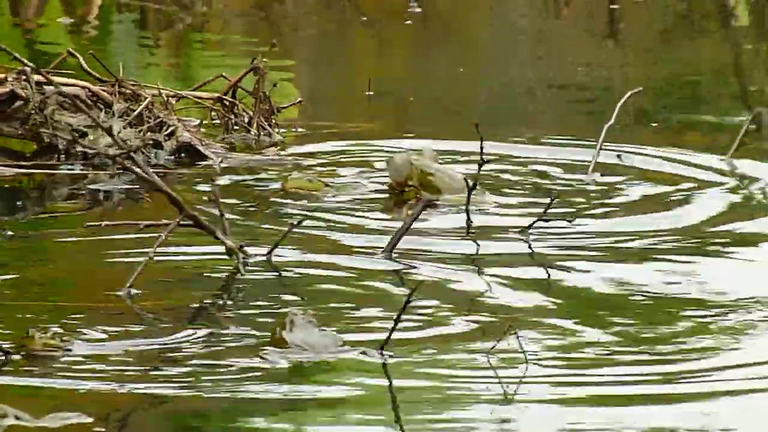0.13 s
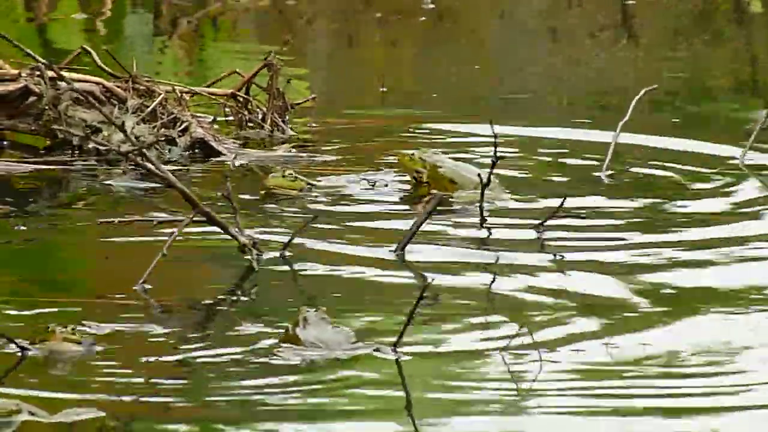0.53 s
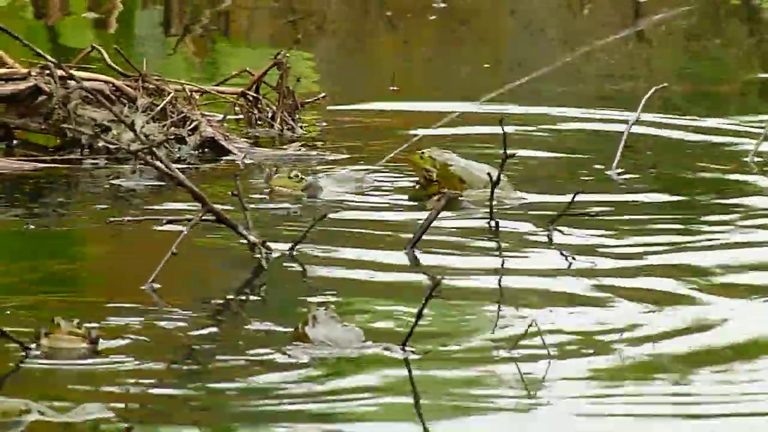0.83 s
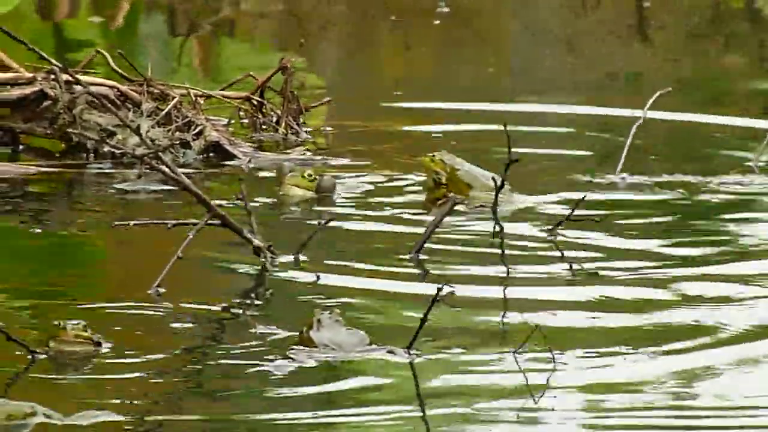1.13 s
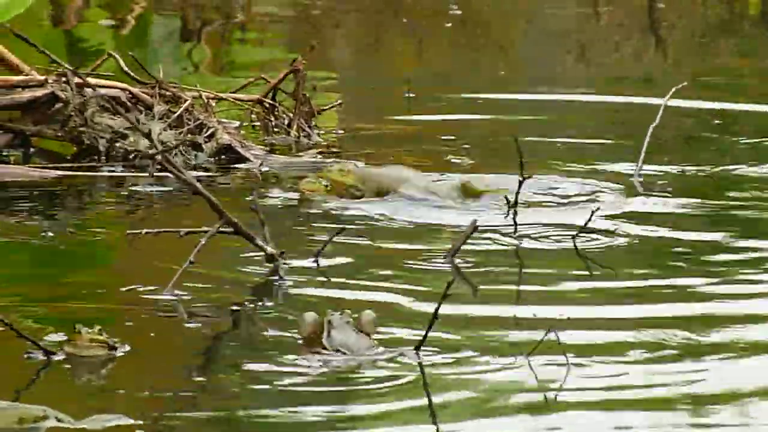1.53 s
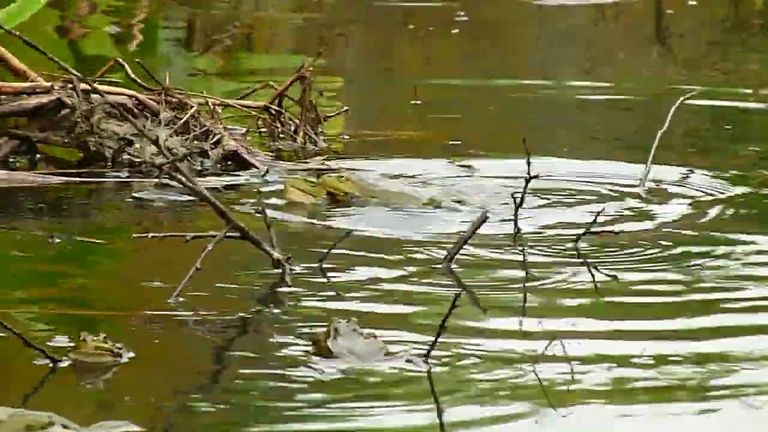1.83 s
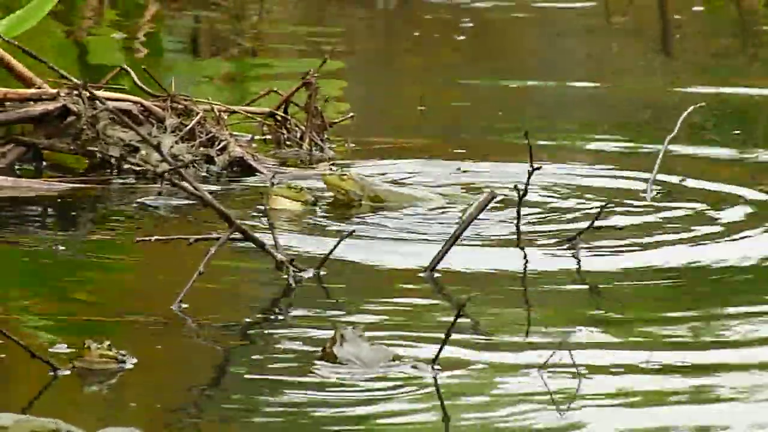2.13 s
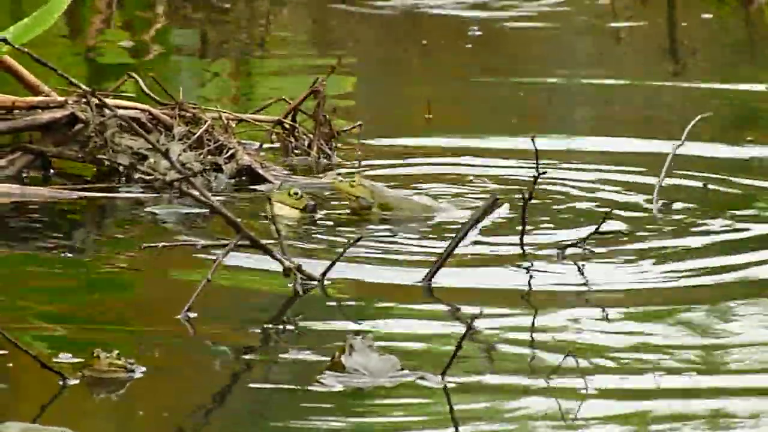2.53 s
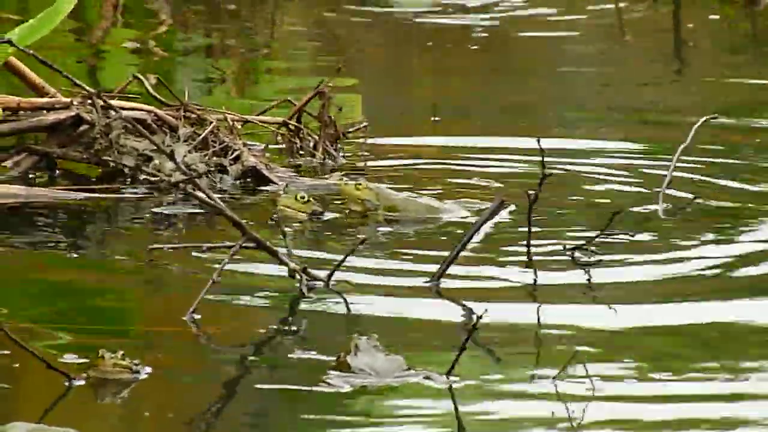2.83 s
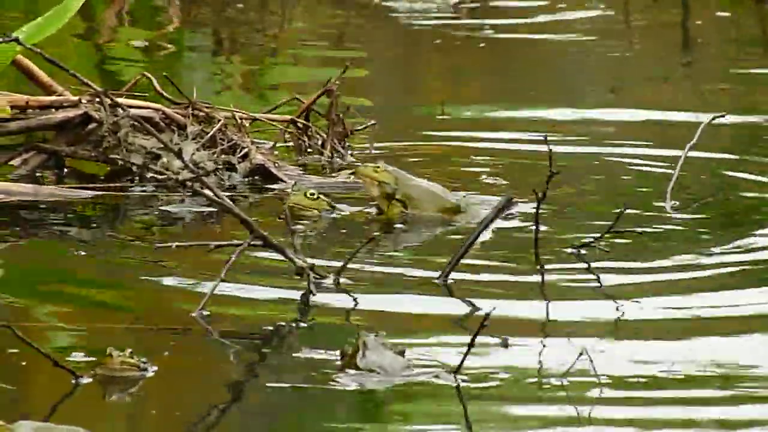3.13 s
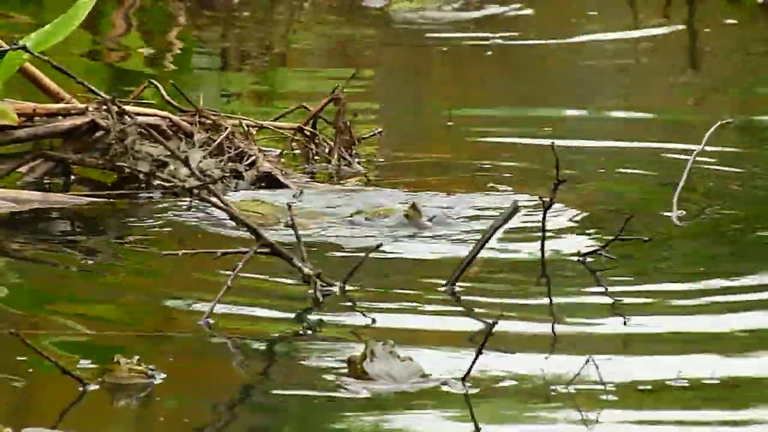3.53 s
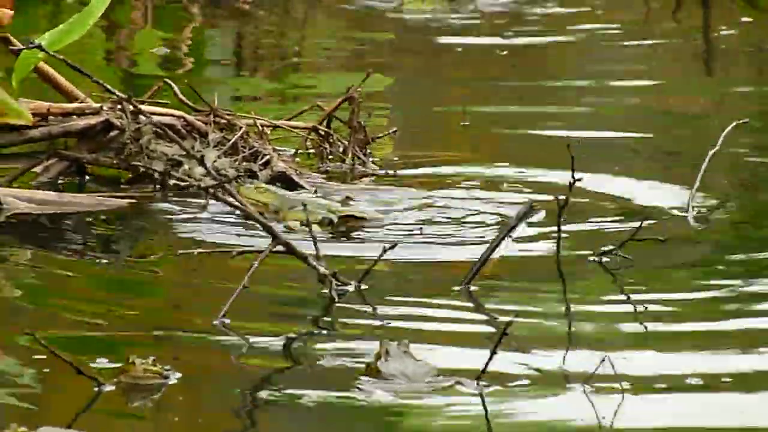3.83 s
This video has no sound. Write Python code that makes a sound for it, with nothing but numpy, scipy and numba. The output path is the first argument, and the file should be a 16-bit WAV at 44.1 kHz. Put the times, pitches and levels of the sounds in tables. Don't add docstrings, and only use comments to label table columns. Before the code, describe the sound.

Marsh frogs call on a pond. Deep and brighter frogs begin at once; from 0.1 to 1.05 s a near frog rattles seven loud, harsh croaks, each a tenth-second burst of rapid pulses. It repeats from 1.4 to 2.3 s; a farther frog answers twice around 2.3-2.6 s. A third run lasts 2.65-3.4 s, then weaker croaks and a low groan close over faint distant noise and rumble.

```python
import sys
import numpy as np
from scipy import signal
from scipy.fft import rfft, irfft
from scipy.io import wavfile
from scipy.ndimage import uniform_filter1d, minimum_filter1d
from numba import njit

SR = 44100
rng = np.random.default_rng(int(sys.argv[2]) if len(sys.argv) > 2 else 0)


def wrap_up_sound(samples):
    columns = np.atleast_2d(samples).T
    tamed = np.clip(columns, -1, 1)
    steps = np.round(tamed * 32767).astype(np.int16)
    wavfile.write(sys.argv[1], SR, steps)


def decibels_to_gain(level_db):
    exponent = np.asarray(level_db, float) / 20
    return 10 ** exponent


N = 176400

# [f/Hz, level/dB]
FAR_NOISE = [(95, -6), (220, -11.5), (600, 3.5), (1000, 6.5), (1900, 2.5), (2700, -16.5), (4300, -6),
             (7500, -21.5)]
# [t/s, level/dB]
FAR_NOISE_LEVEL = [(0, -26.5), (1.2, -32), (2.5, -36), (3.4, -32), (3.55, -36.5), (4, -35)]
# [t/s, level/dB]
BOOM_LEVEL = [(0, -31), (.15, -35.5), (.5, -44), (1.2, -41.5), (1.5, -43), (2.3, -41.5), (2.6, -45),
              (2.75, -40), (3.35, -38), (3.45, -45), (4, -42.5)]
# [t/s, level/dB]
WIND_LEVEL = [(0, -66), (1, -83), (1.2, -54.5), (2.2, -59.5), (3.4, -64), (3.55, -63.5), (4, -64.5)]
# [t/s, level/dB]
TRAFFIC_LEVEL = [(0, -75), (1, -70.5), (1.1, -43), (1.2, -70.5), (3.4, -49.5), (3.55, -44), (4, -43.5)]
# [t/s, f/Hz, level/dB]
ENGINE = [(0, 47, -74), (1.102, 55, -69.5), (1.252, 56, -57.5), (2.5, 59, -59), (3.399, 62, -60.5),
          (4, 64, -56)]
# [multiple of its pitch, level/dB]
ENGINE_UPPER = [(1.52, -6.5), (2.148, 0.5)]
# [t/s, length/s, level/dB, first f/Hz, last f/Hz]
GROAN_CALLS = [(0.001, .09, -25, 794, 934), (.11, 0.051, -24, 1010, 915), (0.332, 0.036, -33, 990, 1050),
               (0.613, 0.12, -22.5, 1270, 1170), (0.734, .08, -24, 895, 1104),
               (0.826, 0.26, -25.5, 727, 830), (1.122, .16, -26.5, 1315, 1470),
               (1.355, 0.074, -25, 1000, 1257), (1.468, 0.077, -27.5, 1220, 1150),
               (1.558, 0.13, -22.5, 1134, 1400), (1.865, .09, -33.5, 1200, 1100),
               (2.04, 0.1, -27, 800, 1054), (2.202, 0.092, -29, 960, 798), (2.195, .1, -23.5, 1470, 1350),
               (2.666, 0.026, -20.5, 1245, 1166), (2.744, 0.029, -24.5, 790, 785),
               (2.777, 0.14, -29.5, 1027, 1090), (2.859, 0.047, -31.5, 900, 970),
               (3.161, 0.12, -33.5, 648, 790), (3.278, 0.044, -18, 1090, 1285),
               (3.34, 0.067, -23.5, 1220, 956), (3.501, 0.079, -28.5, 1190, 1050),
               (3.631, 0.077, -29.5, 1050, 1264), (3.899, 0.52, -26, 1145, 1350)]
# [t/s, level/dB, sac f/Hz, first pulse rate/Hz]
FAR_NOTES = [
    (2.318, -20.5, 1826, 347.3),
    (2.462, -19, 1800, 327.8),
]
# [t/s, level/dB, sac f/Hz, first pulse rate/Hz]
DEEP_NOTES = [(.002, -11.5, 1369, 279), (.21, -12, 1740, 306), (.375, -16, 1563, 290),
              (.48, -19.5, 1613, 261.6), (.625, -16, 1660, 284), (.795, -15.5, 1756, 286.2),
              (1.0, -20, 1386, 275.5), (1.478, -18.5, 1625, 261), (1.71, -33.5, 2076, 273.7),
              (1.99, -22.5, 1780, 265.3), (2.158, -20.5, 1720, 282.4), (2.225, -23.5, 1610, 275),
              (2.722, -17, 1398, 254.4), (2.852, -19.5, 1460, 234.2), (2.95, -22, 1574, 262.7),
              (3.097, -17, 1570, 258.5), (3.2, -24, 1680, 281.3), (3.345, -15.5, 1606, 276.8),
              (3.39, -19.5, 1510, 255.7), (3.503, -20, 1525, 253.7)]
# [t/s, level/dB, sac f/Hz, first pulse rate/Hz]
LEFT_NOTES = [(.055, -15.5, 1740, 288.3), (.35, -22.5, 1710, 291), (.6, -25, 1930, 290),
              (.74, -22.5, 1900, 290.2), (.893, -19.5, 1950, 281.5), (1.05, -20.5, 1910, 295.5),
              (1.19, -19, 1884, 288.3), (1.322, -21.5, 1696, 280), (2.93, -27.5, 1680, 289),
              (3.09, -26, 1810, 289.4), (3.253, -17, 1973, 287.2), (3.427, -18.5, 1920, 292.4),
              (3.584, -19.5, 1780, 297.3), (3.737, -20.5, 1680, 289)]
# [t/s, level/dB, sac f/Hz, first pulse rate/Hz]
NEAR_NOTES = [(.116, -9.5, 1546, 312.7), (.256, -7.5, 1708, 339), (.398, -7.5, 1926, 375.7),
              (.553, -8, 1990, 380.6), (.698, -8, 1996, 389.4), (.836, -10.5, 1980, 344.4),
              (.952, -10, 1708, 282.6), (1.404, -10.5, 1667, 315), (1.534, -7, 1838, 348.2),
              (1.654, -8, 1953, 374.9), (1.790, -9, 2043, 385.2), (1.931, -7, 2058, 385.4),
              (2.062, -9, 2117, 330), (2.183, -10.5, 1973, 317.7), (2.647, -8, 1813, 325.1),
              (2.769, -8.5, 1940, 345.4), (2.896, -8, 2120, 360), (3.018, -7.5, 2092, 392.3),
              (3.150, -7.5, 2210, 346), (3.271, -12, 1880, 336.5)]
# [f/Hz, width/Hz, level/dB]
FAR_THROAT = [(2210, 390, -14.5), (3090, 100, -13), (3270, 39, -13.5)]
DEEP_THROAT = [(2396, 97, -13.5), (3267, 256, -12.5), (5800, 74, -48.5)]
LEFT_THROAT = [(2340, 94, -6.5), (3900, 266, -11), (3080, 530, -14), (6100, 970, -50.5)]
NEAR_THROAT = [(2600, 294, -13), (3399, 150, -10.5), (5760, 170, -24.5), (6995, 440, -32.5),
               (3046, 150, -17), (8560, 220, -28), (3640, 230, -27)]
FAR_BRIGHTNESS = [0, -3.5]
DEEP_BRIGHTNESS = [-8, -2, 5, 2.5, -1, -2.5, -2, -6.5, 7, -2, -1, -8.5, 0.5, -2, 0, -2, 7, -6.5, -4, -4]
LEFT_BRIGHTNESS = [-4.5, -1, 3.5, 6.5, 1.5, 1.5, -2, -5, 0, 1, 0.5, 1, 0, -6]
NEAR_BRIGHTNESS = [-3.3, -1.2, -1.2, -1.8, -1.7, 0.6, -2.8, -1.1, -2.5, 1, 1, 0.5, -0.26, -2, -0.2, 0.99,
                   0.95, 1, 0.43, 0]
NEAR_TAUTNESS = [1.3, 1.1, 0.79, 1.2, 0.63, 0.6, 1.2, 3.3, 1, 0.6, 1.4, 0.73, 1.2, 1.2, 1.4, 0.79, 0.44,
                 0.72, 0.3, 1.5]
# [f/Hz, width/Hz, level/dB]
BODY_RESONANCES = [(310, 45.5, -31.5), (1050, 490, -15)]
# [t/s, peak over full scale level/dB]
HARD_PULSES = [(.405, .2), (.563, .9), (1.547, .6), (1.815, 1.1), (2.777, .8), (2.92, 1.1), (3.032, .7),
               (3.166, 1.3)]
# [left minus right level/dB, lead of the left side/samples]
POSITIONS = [
    (1.1, 1.9),
    (4.5, 1.5),
    (3.5, 1.5),
    (-.7, 2.),
    (.5, 1.1),
]

GAIN_DB = -4.5
ROUGH_LAST = .12
THROAT_SKIRT = 2.6
SIDES = np.array([[1], [-1]])


def noise():
    return rng.standard_normal(N)


def unit(x):
    return x / np.sqrt(np.mean(x ** 2) + 1e-18)


def curve(table):
    return decibels_to_gain(np.interp(np.arange(N) / SR, *np.array(table).T))


def walk(rate_hz):
    k = int(SR / rate_hz)
    steps = np.repeat(rng.standard_normal(N // k + 1), k)
    return 0.75 * uniform_filter1d(uniform_filter1d(steps, k), k)[:N]


def add(track, x, t):
    i = int(t * SR)
    track[i:i + len(x)] += x[:N - i]


def ring(x, hz, width):
    return signal.lfilter(*signal.iirpeak(min(hz, .45 * SR), hz / width, fs=SR), x)


@njit
def glide(x, hz, width):
    y, band, low = np.empty(len(x)), 0., 0.
    for i in range(len(x)):
        g, k = np.tan(np.pi * hz[i] / SR), width / hz[i]
        v = (band + g * (x[i] - low)) / (1 + g * (g + k))
        band, low, y[i] = 2 * v - band, low + 2 * g * v, k * v
    return y


def glide_twice(x, hz, width, skirt):
    return glide(glide(x, hz, 1. * width), hz, 1. * width * skirt)


def far_noise():
    out, (f, level_db) = 0, np.array(FAR_NOISE).T
    for hz in 95 * 2 ** np.arange(0, 6.6, .5):
        mid, side = (ring(ring(noise(), hz, hz / 2.1), hz, hz) for _ in range(2))
        db = np.interp(np.log(hz), np.log(f), level_db) + walk(11)
        out = out + decibels_to_gain(db) * (mid + min(hz / 15000.0, .35) * side * SIDES)
    return unit(out) * curve(FAR_NOISE_LEVEL)


def boom():
    band = ring(ring(noise(), 338.3, 200), 338.3, 120)
    return unit(band) * decibels_to_gain(4.6 * walk(24.79)) * curve(BOOM_LEVEL)


def rumble():
    wind = unit(ring(noise(), 47, 13) + 0.19 * ring(noise(), 160, 60))
    traffic = ring(noise(), 89, 150) * 9
    return wind * curve(WIND_LEVEL) + traffic * curve(TRAFFIC_LEVEL)


def engine():
    t, (s, hz, db) = np.arange(N) / SR, np.array(ENGINE).T
    turn = 2 * np.pi * np.cumsum(np.interp(t, s, hz)) / SR
    tone = np.sin(turn) * decibels_to_gain(3.1 * walk(5.9))
    for multiple, level_db in ENGINE_UPPER:
        tone = tone + decibels_to_gain(level_db + 5.7 * walk(5)) * np.sin(multiple * turn)
    return tone * decibels_to_gain(np.interp(t, s, db)) * np.sqrt(2)


def banks(x):
    decay_s, delay_s, level_db = 0.23, 0.0082, -10.5
    t = np.arange(int(SR / 2)) / SR
    mid, side = rng.standard_normal((2, len(t))) * decibels_to_gain(-60 * t / decay_s) * (t > delay_s)
    side = signal.lfilter(*signal.butter(1, 2500, "high", fs=SR), side)
    tail = (mid + side * SIDES) / np.sqrt(np.sum(mid ** 2))
    return decibels_to_gain(level_db) * signal.fftconvolve(x[None], tail, axes=1)[:, :N]


def pulses(rate, rough):
    scatter_db, alternate_db, breath_db = 2.8, 1.43, -22
    n, count = len(rate), np.arange(120)
    gap_chance, size_chance = rng.standard_normal((2, 120))
    even = np.interp(count + 0.2945, np.cumsum(rate) / SR, np.arange(n), right=2 * n)
    at = np.clip(even, 0, n - 1).astype(int)
    moment = even + rough[at] * gap_chance * SR / rate[at]
    size_db = scatter_db * size_chance + alternate_db * (-1.) ** count
    size = decibels_to_gain(size_db * np.sqrt(rough[at] / ROUGH_LAST))
    ok = (moment > 0) & (moment < n - 2)
    moment, size = moment[ok], size[ok]
    i, clicks = moment.astype(int), np.zeros(n)
    np.add.at(clicks, i, -size * (1 - moment + i))
    np.add.at(clicks, i + 1, -size * (moment - i))
    puff = signal.lfilter([1], [1, -.975], -clicks) * rng.standard_normal(n)
    return unit(clicks) + decibels_to_gain(breath_db) * unit(puff)


def groans():
    out = np.zeros(N)
    for start, length, db, first_hz, last_hz in GROAN_CALLS:
        u = np.linspace(0, 1, int(length * SR))
        p = pulses(185 * (.85 + .3 * u), .06 + 0 * u) * np.sin(np.pi * u) ** .7
        voice = glide_twice(p, first_hz + (last_hz - first_hz) * u, 150, THROAT_SKIRT)
        add(out, decibels_to_gain(db) * 11 * voice, start)
    return out


def frog(notes, throat, bright, taut=None, hold=0.69, attack=0.51, length=0.56, climb=1.):
    note_s, end_s, sag_s, drop_s = .11, 0.016, .042, .013
    last_rate_hz, sac_width_hz = 225, 216
    out, t = np.zeros(N), np.arange(int(SR / 7)) / SR
    rise_s = max(attack * 0.018, .02)
    swell = np.sin(np.pi / 2 * np.clip(t / rise_s, 0, 1)) ** 2
    shape = swell * np.exp(-np.maximum(t - length * note_s, 0) / end_s)
    tired = 1 - np.exp(-(t / sag_s) ** 3)
    for (start, db, sac_hz, rate_hz), bright_db, keep in zip(notes, bright, taut or np.ones(len(notes))):
        slack = 1 - np.exp(-np.maximum(t - rise_s - keep * hold * 0.027, 0) / drop_s)
        rate = rate_hz + (last_rate_hz - rate_hz) * tired
        p = pulses(rate, .002 + ROUGH_LAST * tired) * shape
        tint = rng.standard_normal(8)
        low, high = p * decibels_to_gain(-12 * slack), p * decibels_to_gain(-3.5 * slack)
        sac = glide_twice(low, sac_hz * (1 + climb * .05 * (tired - .5 - slack)), sac_width_hz, 6.)
        body = 0
        for f, w, d in BODY_RESONANCES:
            body = body + decibels_to_gain(d) * ring(ring(low, f, w), f, 2 * w) / np.sqrt(w / sac_width_hz)
        bend = (1950 / sac_hz) ** .24 * (1 - .045 * (t / note_s - .5))
        upper = 0
        for k, (f, w, d) in enumerate(throat):
            hz = f * bend ** (2 if k == 2 else 1)
            upper = upper + (-1) ** k * decibels_to_gain(d + bright_db + tint[k]) * glide_twice(high, hz, w, THROAT_SKIRT)
        add(out, decibels_to_gain(db) * 9 * (sac + body * decibels_to_gain(tint[7]) + upper), max(start - .005, 0))
    return out


def snaps():
    out, t = np.zeros(N), np.arange(300) / SR
    snap = np.exp(-t / .0009) * np.cos(2 * np.pi * 1950 * t) * np.minimum(t * 8000, 1)
    for start, _ in HARD_PULSES:
        add(out, -decibels_to_gain(2.5 - GAIN_DB) * snap, start)
    return signal.lfilter(*signal.butter(2, [500, 3600], "band", fs=SR), out) * 1.8


def place(x, pan_db, lead):
    f = np.arange(N // 2 + 1) / N
    turn = np.exp(1j * np.pi * f * lead * SIDES)
    return irfft(rfft(x) * turn, N) * decibels_to_gain(pan_db * SIDES / 2)


def scene():
    near = frog(NEAR_NOTES, NEAR_THROAT, NEAR_BRIGHTNESS, NEAR_TAUTNESS) + snaps()
    left = frog(LEFT_NOTES, LEFT_THROAT, LEFT_BRIGHTNESS, hold=0.89, attack=1.26, length=0.48, climb=-0.31)
    deep = frog(DEEP_NOTES, DEEP_THROAT, DEEP_BRIGHTNESS, hold=0.99, attack=0.82, length=0.82)
    far = frog(FAR_NOTES, FAR_THROAT, FAR_BRIGHTNESS, hold=0.8, attack=1.76, length=0.6, climb=-0.37)
    voices = [near, left, deep, far, groans()]
    placed = sum(place(v, *p) for v, p in zip(voices, POSITIONS))
    return placed + banks(sum(voices)) + far_noise() + boom() + rumble() + engine()


def band_limit(x):
    return signal.sosfilt(signal.butter(12, 8800, fs=SR, output="sos"), x)


def record(dry):
    limit, limit_s = .93, .004
    f = np.arange(N // 2 + 1) * SR / N
    treble_db = -8 / (1 + np.exp((4400 - f) / 120)) - 18 / (1 + np.exp((7630 - f) / 60))
    colour = decibels_to_gain(treble_db) * f ** 2 / (f ** 2 + 40 ** 2)
    x = irfft(rfft(dry) * colour, N) * decibels_to_gain(GAIN_DB)
    top = np.full(N, limit)
    for start, db in HARD_PULSES:
        top[int((start - limit_s / 2) * SR):int((start + limit_s / 2) * SR)] = decibels_to_gain(db)
    size = int(limit_s * SR)
    gain = minimum_filter1d(top / np.maximum(np.abs(x).max(0), top), size)
    return band_limit(x * uniform_filter1d(gain, size))


dry = scene()
out = record(dry)
wrap_up_sound(out)
```